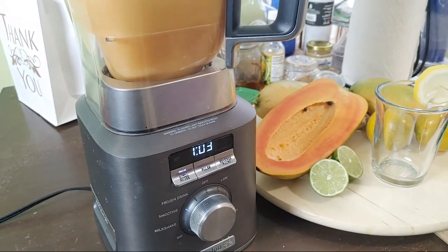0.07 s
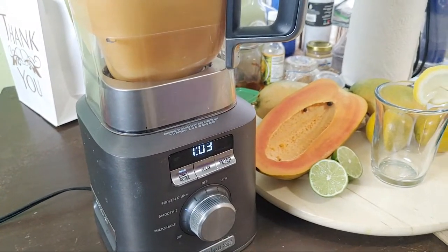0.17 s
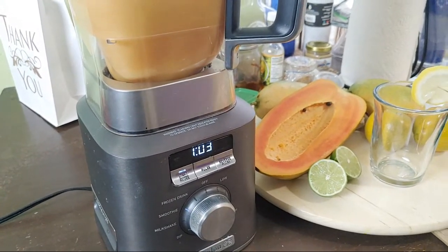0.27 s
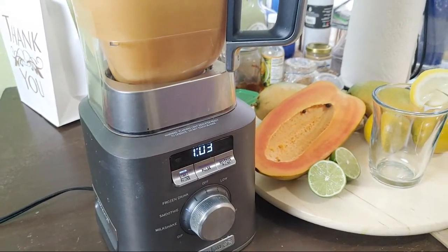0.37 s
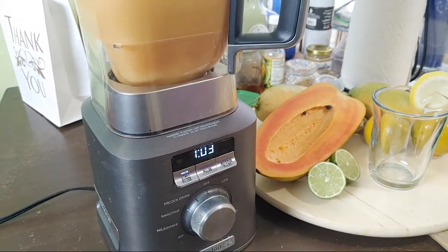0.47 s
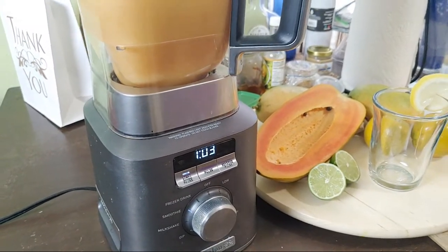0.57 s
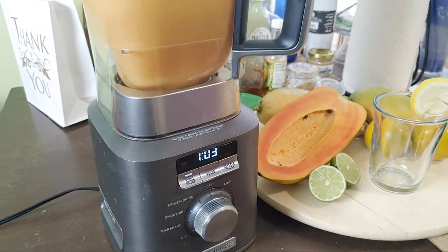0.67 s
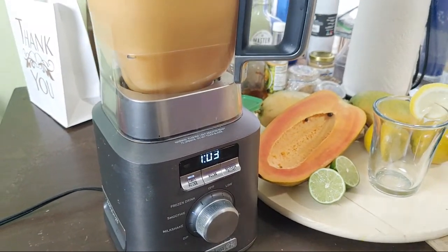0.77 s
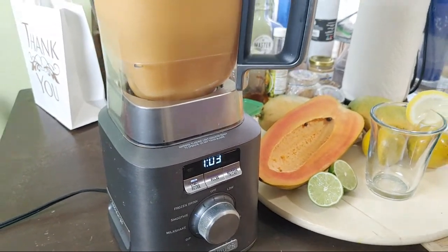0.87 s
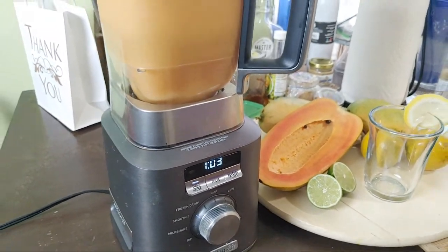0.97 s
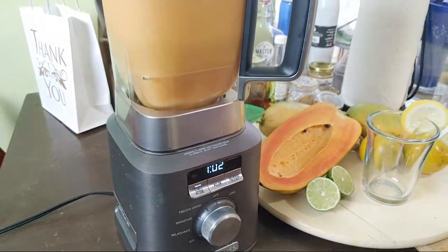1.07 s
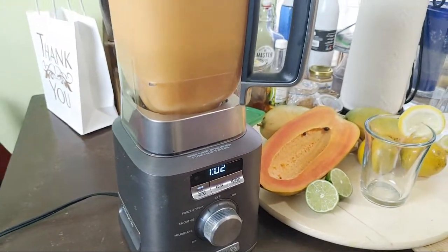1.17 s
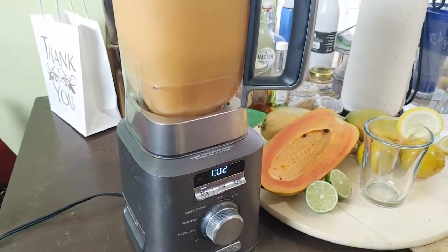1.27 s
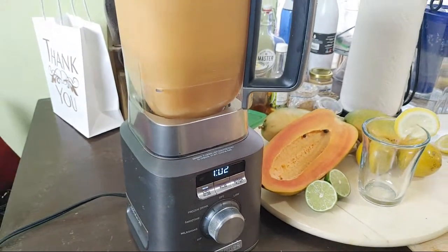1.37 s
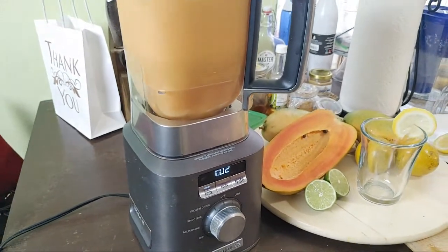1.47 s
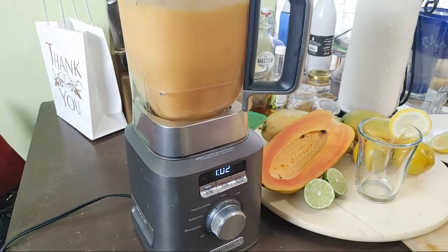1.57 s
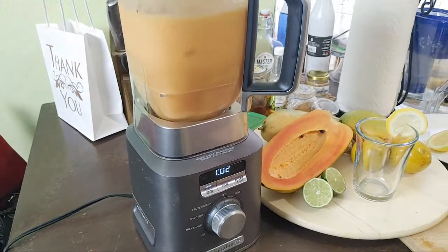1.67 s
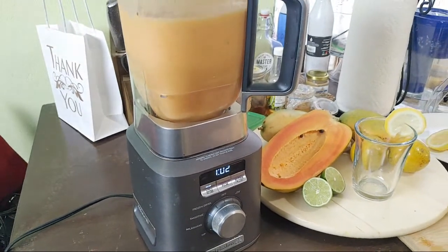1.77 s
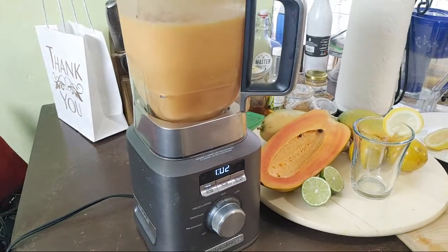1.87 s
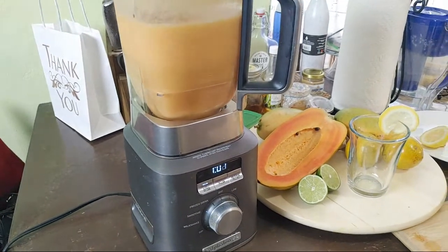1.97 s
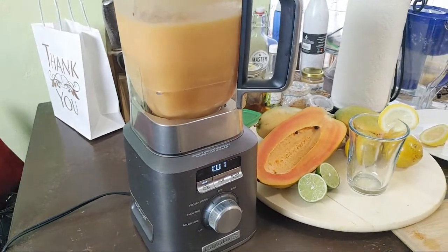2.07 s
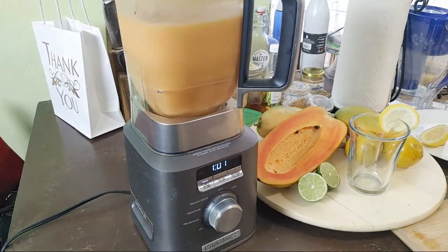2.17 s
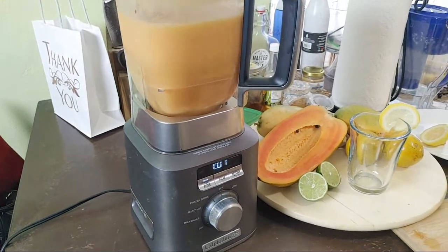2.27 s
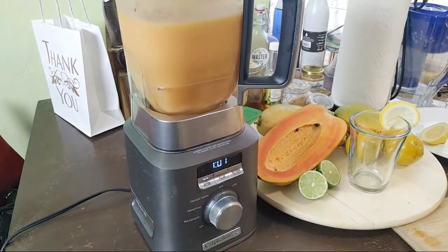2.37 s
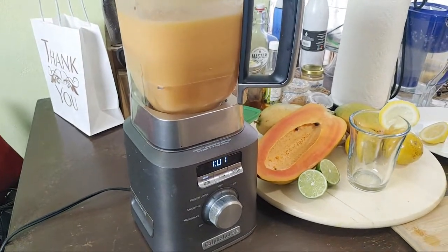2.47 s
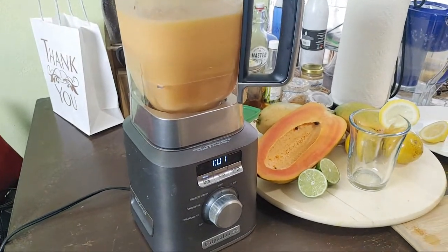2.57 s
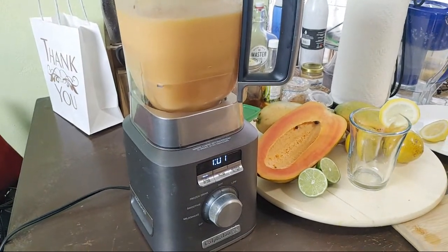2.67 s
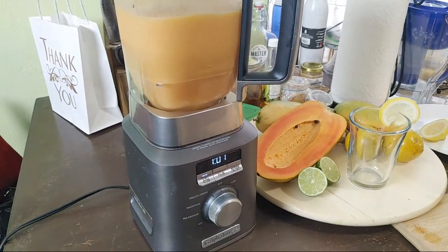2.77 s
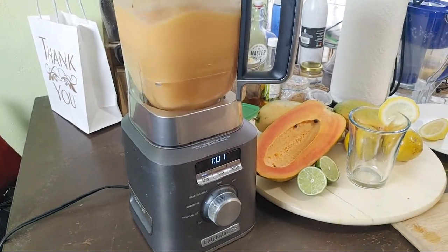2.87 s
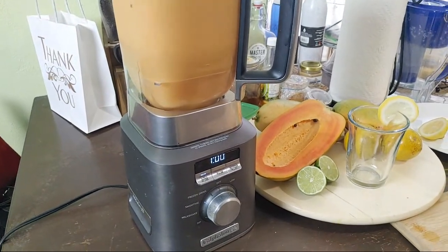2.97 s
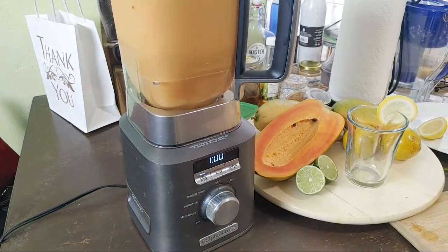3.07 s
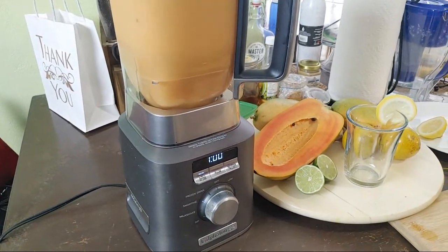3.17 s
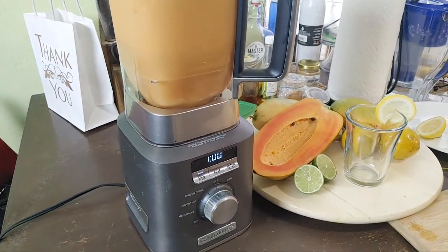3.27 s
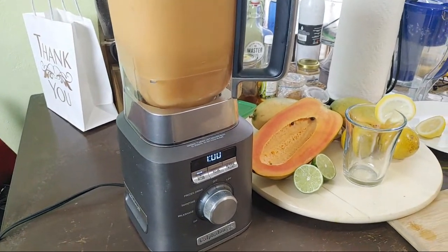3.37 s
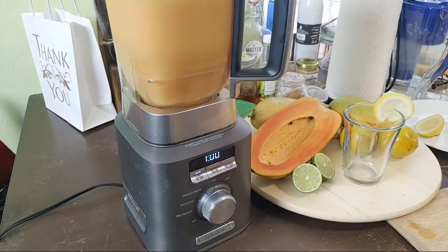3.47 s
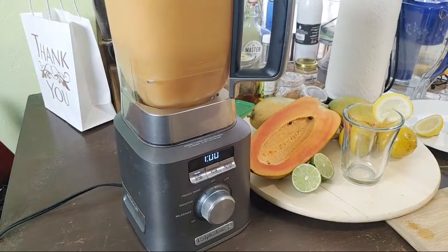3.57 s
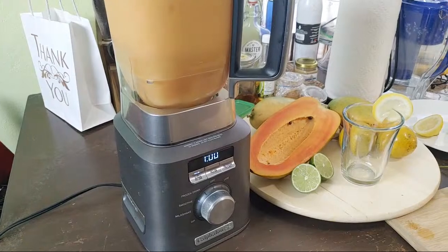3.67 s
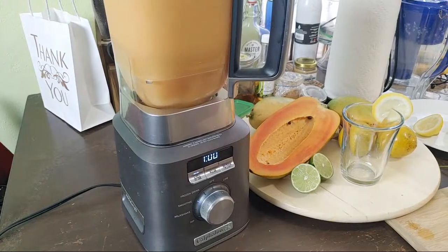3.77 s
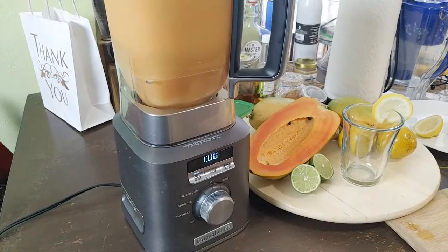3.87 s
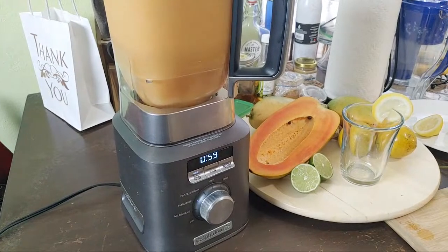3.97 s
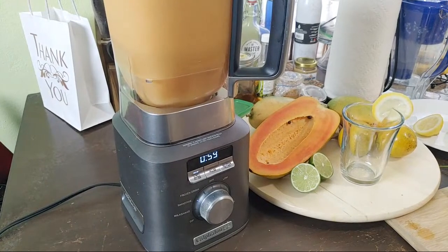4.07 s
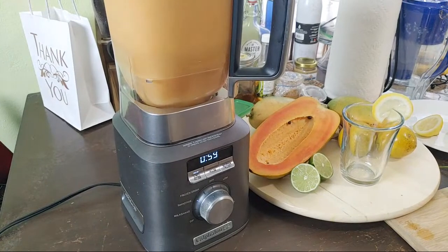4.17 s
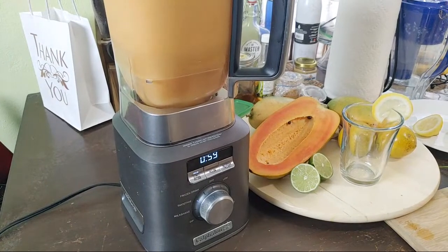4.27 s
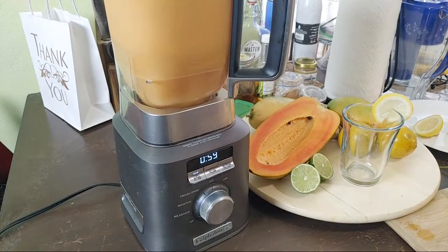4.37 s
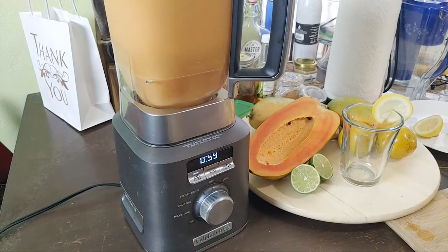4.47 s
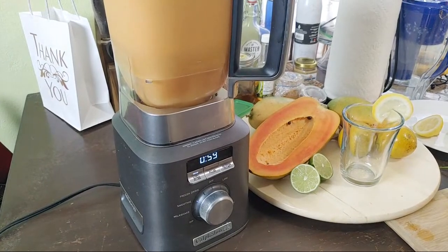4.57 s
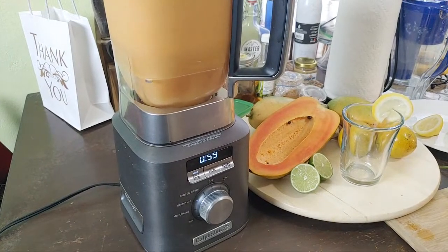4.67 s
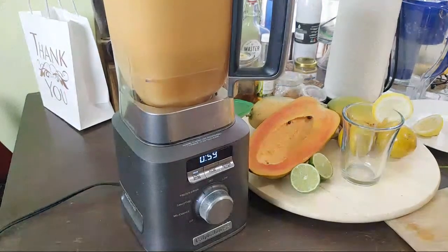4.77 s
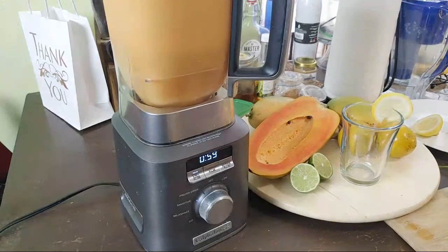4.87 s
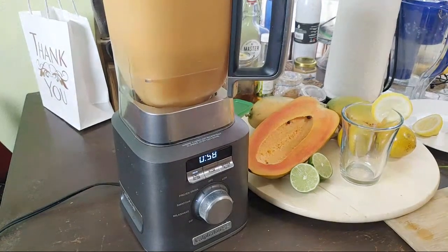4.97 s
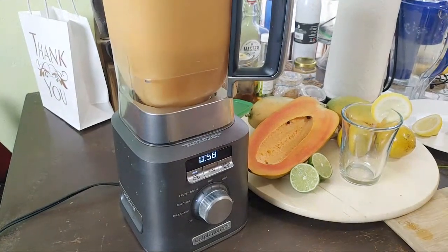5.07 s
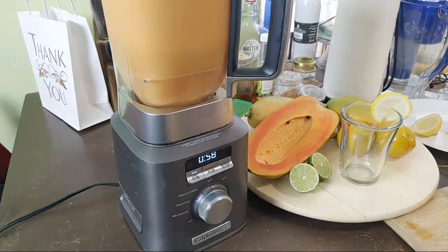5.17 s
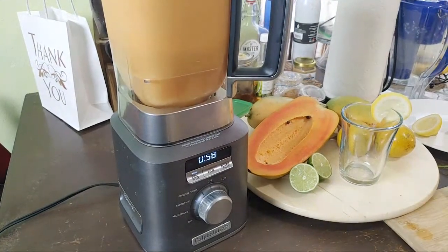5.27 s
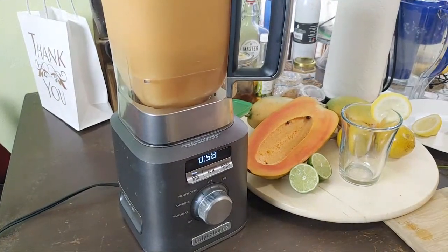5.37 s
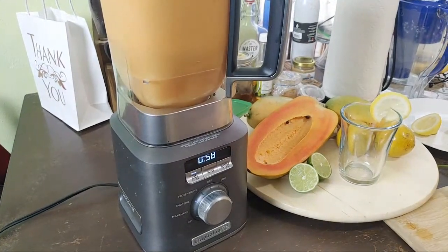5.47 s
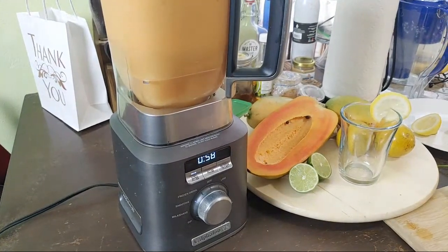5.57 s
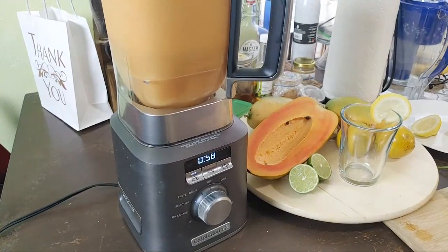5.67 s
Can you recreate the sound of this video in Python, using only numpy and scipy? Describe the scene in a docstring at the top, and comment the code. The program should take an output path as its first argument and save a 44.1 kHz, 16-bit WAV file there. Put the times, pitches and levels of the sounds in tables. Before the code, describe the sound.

A countertop blender is already running on thick icy pulp, heard close and dry in a small kitchen, the same in both channels. A hard, buzzy hum and gritty watery rush hold for about 1.1 s, with a few ice ticks early on and a brief sag near 0.55 s. The pitch slides down and the motor drops out by 1.4 s; slush settles with soft plops until only low room rumble and faint knocks remain around 1.9 s. A mains-like buzz grows from 2.1 s, ice clacks, with a sharp crack near 2.55 s, and the blades catch at about 2.7 s with a heavy wet heave. Pitch climbs steeply, reaching full speed around 3.7 s: a loud, rough whine with hissing spray and air, dipping briefly several times. At 5.4 s power cuts; the pitch falls quickly amid churning and several ice knocks until the end at about 5.7 s.

```python
"""A hard hum and a watery rush come first: a countertop blender working thick icy pulp. It stops,
starts again, runs up to full speed and is cut off, heard in a kitchen by one close microphone.
The shaft hums at multiples of its speed and the windings buzz at twice the mains, all as sine tones.
Pulp, ice grains and cooling air are gritty noise in shaped bands; ice chunks knock on the plastic jar
as decaying noise and damped rings. Low room rumble lies beneath, and both channels are the same."""
import sys
import numpy as np
from scipy import signal
from scipy.fft import rfft, irfft, next_fast_len
from scipy.io import wavfile

SR = 44100
rng = np.random.default_rng(int(sys.argv[2]) if len(sys.argv) > 2 else 0)


def unload_audio(sound):
    """Save the sound as a 16-bit wav file, at the path given as the first command line argument."""
    columns = np.transpose(np.atleast_2d(sound))
    # keep every value between -1 and 1, then stretch to whole-number steps
    steps = np.round(np.clip(columns, -1, 1) * 32767)
    wavfile.write(sys.argv[1], SR, steps.astype(np.int16))


N = 252693
FULL_SPEED = 232   # turns per s, the reference for every level given "at full speed"

# The shaft, one table for each run. Each row: time in seconds, speed in turns per s.
SPEED = [
    [(0.0, 143), (0.09, 151.5), (0.2, 147.5), (0.3, 138.5), (0.75, 136), (1.12, 131), (1.25, 119),
     (1.33, 108), (1.37, 101)],
    [(2.67, 64), (2.78, 92), (3.0, 125), (3.1, 165), (3.18, 185), (3.42, 216), (3.56, 225), (3.72, 235.2),
     (4.26, 237.6), (4.5, 236), (4.85, 238.8), (5.38, 236), (5.43, 221), (5.5, 180), (5.65, 120),
     (5.73, 100)],
]
# The vortex collapses and drags on the blades. Each row: time in seconds, speed lost in turns per s.
DRAGS = [(0.55, 6.5), (3.89, 7.5), (4.09, 2.2), (4.37, 6), (4.68, 3), (4.99, 6), (5.31, 2.5)]
DRAG_S = 0.075   # from the deepest point of a drag to 1/e of it
# Tones of the shaft. Each row: multiple of the speed, level at full speed in dB before the housing,
# slope in dB per octave of speed, gain in dB per turn/s of drag, share of the current's fall in dB per dB,
# waver in dB and phase blur in radians, both before they are scaled by the shaking.
ORDERS_OF_SHAFT = [(1, -38, -3.5, 0.43, 0.16, 4.4, 1.35), (2, -37, 3.5, 0.82, 0.47, 2.5, 1.36),
                   (3, -44, 10, 1.4, 1.3, 3, 0.97), (4, -29.5, 29, 0.65, 0.94, 1, 0.079),
                   (5, -33.5, 8, 1.5, 1.9, 1, 0.38), (6, -37, 17, -0.5, 0.72, 1, 0.91),
                   (7, -42.5, 10, -0.4, 0.65, 4, 0.35), (8, -40, 5, -0.14, 0.51, 2, 1.2)]
# How well the housing passes a tone. Each row: frequency in Hz, gain in dB.
HOUSING = [(60, -9), (100, -2.5), (118, 0.5), (135, 10.5), (160, 8), (185, 10.5), (200, -11), (214, 9),
           (228, 0.7), (270, 2), (300, 10.5), (350, -4.5), (415, 12.5), (470, -5.7), (620, -8), (740, -10),
           (850, 1.5), (940, 6.5), (990, 7), (1070, -4.5), (1180, 0.9), (1900, 1.5)]


def motor():
    """Shaft tones through the housing, changed by drag and current; also gives angle and speed."""
    t = np.arange(N) / SR
    hum, angle = np.zeros(N), np.zeros(N)
    turning = np.ones(N)      # one turn per s at rest keeps later logarithms finite
    drag = sum(lost * np.exp(-((t - s) / DRAG_S) ** 2) for s, lost in DRAGS)
    current_db = in_time(BUZZ)[0] - np.max(np.transpose(BUZZ)[1])
    housing_hz, housing_db = np.transpose(HOUSING)
    for turns in SPEED:
        speed = in_time(turns)[0] - drag
        start, end = turns[0][0], turns[-1][0]
        # fades of 30 ms just outside the run
        on = np.clip(np.minimum(t - start + .03, end + .03 - t) / .03, 0, 1)
        turn = 2 * np.pi * np.cumsum(speed * (1 + .003 * drift(25))) / SR
        shake = (speed / FULL_SPEED) ** 10      # near full speed the base rocks and blurs the tones
        for multiple, db, slope_db, drag_db, share, waver_db, blur in ORDERS_OF_SHAFT:
            level = db + slope_db * np.log2(speed / FULL_SPEED)
            level += drag_db * drag + share * current_db
            level += np.interp(np.log(multiple * speed), np.log(housing_hz), housing_db)
            level += waver_db * (.35 + shake) * np.clip(drift(9), -2.5, 1.2)
            phase = multiple * turn + blur * shake * drift(15.2) + rng.uniform(0, 2 * np.pi)
            hum += on * np.sqrt(2) * amp(level) * np.sin(phase)
        angle = np.where(on > 0, turn, angle)
        turning = turning + on * speed
    return hum, angle, turning


# Current through the windings, as the level of their buzz. Each row: time in seconds, level in dB.
BUZZ = [(0, -38.5), (1.15, -40), (1.25, -59), (2.0, -55), (2.12, -48), (2.26, -37.5), (2.4, -38),
        (5.4, -38), (5.48, -81)]
MAINS_BUZZ_HZ, BUZZ_SECOND_DB = 120, -20.5   # the second harmonic is against the first


def windings():
    """Magnetic pull at twice the mains rate while current flows."""
    turn = 2 * np.pi * MAINS_BUZZ_HZ * np.arange(N) / SR
    wave = np.sin(turn) + amp(BUZZ_SECOND_DB) * np.sin(2 * turn)
    return np.sqrt(2) * amp(in_time(BUZZ)[0] + drift(4.3)) * wave


# The mixture. Each row: time in seconds, heave of the pulp in dB, rush on the jar wall in dB,
# spray and cooling air in dB; the slugs shift all three.
MIXTURE = [(0.0, -29, -27, -38.5), (0.12, -33, -24.5, -41), (1.13, -33.5, -27, -41.5),
           (1.33, -36.5, -29, -46), (1.5, -36.5, -39.5, -58.5), (1.61, -41.5, -39.5, -63),
           (1.69, -49, -50.5, -66), (1.81, -45, -42, -62.5), (1.9, -63.5, -63, -78),
           (2.12, -49.5, -62, -76.5), (2.37, -42.5, -44.5, -59.5), (2.61, -36, -36, -55),
           (2.72, -34, -27, -46.5), (2.82, -17, -22.5, -41), (3.02, -22, -24, -44), (3.07, -36, -28, -40),
           (3.4, -32.5, -25, -35), (5.36, -37, -26, -34.5), (5.42, -31, -28.5, -37.5),
           (5.58, -29, -28.5, -43.5), (5.73, -32.5, -36.5, -50.5)]
# Colour of the heaving pulp. Each row: frequency in Hz, relative level in dB per Hz.
HEAVE = [(18, -69), (30, -71), (102, -5.5), (161, -6.5), (305, 5), (400, -7.5), (604, -7), (900, -9),
         (1170, -19), (1980, -120)]
# Colour of the rush on the wall. Each row: frequency in Hz, relative level in dB per Hz.
RUSH = [(240, -26), (400, -8.5), (708, 4.5), (903, -4), (1200, 3.5), (1510, -5), (1990, -5.5), (2860, -12),
        (5000, -41.5), (6500, -107), (11000, -120)]
# Colour of spray and cooling air. Each row: frequency in Hz, relative level in dB per Hz.
AIR = [(2500, 1.5), (3500, -2.5), (5000, 0), (7000, 2), (9000, 4.5), (12000, -6.5), (15500, -7)]
# ring of the wall against the plain rush: level at rest, and its growth per turn/s
JAR_RING_DB, JAR_RING_DB_PER_TURN = -2, 0.02


def mixture(angle, speed):
    """Pulp heaves, grains rush on the wall with a swell once a turn, spray and air hiss."""
    heave_db, rush_db, air_db = in_time(MIXTURE) + slugs()
    sweep = 1 + 0.14 * np.cos(angle)      # the load passes one side of the jar each turn
    grains = gritty(900, 3.6, -6) * sweep
    heave = coloured(gritty(150, 1.67, -15), HEAVE, patchy_db=1.9)
    wall_ring = amp(JAR_RING_DB + JAR_RING_DB_PER_TURN * speed) * rms_one(jar(grains))
    rush = rms_one(coloured(grains, RUSH, patchy_db=2.0) + wall_ring)
    spray = grains + amp(2.5) * gritty(4000, 7.0, -7)
    air = coloured(spray, AIR, patchy_db=1.23)
    return amp(heave_db) * heave + amp(rush_db) * rush + amp(air_db) * air


# A slug of pulp drops onto the blades. Each row: start in seconds, then the change of the heave,
# of the rush and of the spray, all in dB.
SLUGS = [(1.735, 3.5, -10, -4), (2.545, -1, 0, 10), (2.63, 13, 9.5, 8), (2.752, -2, -1.5, -1),
         (3.14, -1, 6.5, 4.5)]
SLUG_RISE_S, SLUG_HOLD_S, SLUG_FALL_S = 0.0037, 0.019, 0.061


def slugs():
    """Change in dB of the three mixture layers: each slug sets in, holds and dies away."""
    t = np.arange(N) / SR
    edges = np.cumsum([0, SLUG_RISE_S, SLUG_HOLD_S, SLUG_FALL_S])
    return sum(np.outer(change, np.interp(t - s, edges, [0, 1, 1, 0])) for s, *change in SLUGS)


# Modes of the plastic jar wall. Each row: frequency in Hz, width in Hz, relative level in dB.
JAR = [(320, 30, -7), (440, 22, 1.5), (929, 53, 9.5), (1162, 52, 11), (1355, 100, 2), (1910, 270, -4.5),
       (2644, 430, -12)]


def jar(x):
    """The wall rings in a few damped modes of alternating sign."""
    return sum((-1) ** k * amp(db) * resonance(x, hz, width) for k, (hz, width, db) in enumerate(JAR))


# Ice chunks on the jar, as the drive of each part before its own gain. Each row: time in seconds,
# crack in dB, then bright splinter, wall knock and low thud in dB against the crack.
KNOCKS = [(0.1334, -28.5, -11, 13, -18), (0.1623, -27, -10.5, 8, -13), (0.2687, -20, -16.5, 4, -14),
          (1.284, -24, -19, -9, -11), (1.351, -29, -30, -9, -16), (1.4638, -39, -23, 4, -12),
          (1.5452, -43, -10, 12.5, 0), (1.594, -36, -18, -1, -9), (1.6494, -46.5, -7.5, 10, 0),
          (1.6897, -36.5, -21, 8, 3), (1.7372, -42.5, -23, -11, 23), (1.7768, -30.5, -27, -23, 1),
          (1.7944, -36.5, -17, 4.5, 3), (1.8208, -30.5, -23, 3.5, -22), (1.8895, -49, -21, -1, -7),
          (1.9133, -57, -26, 5, 13), (1.999, -52, -25, 13.5, -13), (2.078, -57, -14, -7, 20),
          (2.189, -46.5, -17, -1, 7), (2.2449, -47, -30, -12, 17), (2.295, -39, -22, -1, 5),
          (2.3803, -37.5, -22, 8, 9), (2.4183, -30.5, -29, 4.5, 8), (2.4412, -31, -17.5, 2, -2),
          (2.5282, -35, -15, 11, -15), (2.5476, -14, -17.5, -9.5, -13), (2.6513, -24.5, -10.5, 3, -13),
          (2.6695, -23, -16, 13.5, 6), (2.754, -20.5, -25, 4.5, 8.5), (2.789, -24, -15, 4, 3),
          (2.8496, -26, -8, 6, -3), (2.9162, -30.5, -11, 13, -7), (3.0868, -17.5, -25, -23, -5),
          (3.169, -21, -16, -1, -2), (5.4753, -31, -16, 9, -4), (5.5586, -22.5, -12, 7.5, 6),
          (5.5727, -18, -14.5, 1, -7), (5.6726, -23.5, -22, 5, 0), (5.7083, -29, -10.5, 5, 2)]


def knocks():
    """A chunk cracks, splinters, sets the wall ringing and shoves the pulp."""
    s, crack_db, bright_db, wall_db, thud_db = np.transpose(KNOCKS)
    blows = np.zeros((4, N)) + 1e-18
    drive_db = crack_db + np.array([0 * s, bright_db, wall_db, thud_db])
    blows[:, np.round(s * SR).astype(int)] = amp(drive_db)
    fall = amp(-60 / (0.031 * SR))      # 60 dB down in 31 ms
    dying = signal.lfilter([1], [1, -fall], blows[:2]) * rng.standard_normal(N)
    dying += 2.4 * blows[:2]      # the first touch is a clean click
    crack_band = signal.butter(2, [1500, 4500], "band", fs=SR, output="sos")
    splinter_band = signal.butter(3, [4500, 10500], "band", fs=SR, output="sos")
    crack = amp(-3.5) * signal.sosfilt(crack_band, dying[0])
    splinter = amp(10.5) * signal.sosfilt(splinter_band, dying[1])
    wall = amp(30.5) * resonance(jar(blows[2]), 1200, 1100)
    shove = resonance(blows[3], 180, 180)
    # a short push, then a ring
    thud = amp(28.5) * resonance(shove, 180, 100) + amp(44.5) * resonance(shove, 236, 22)
    return crack + splinter + wall + thud


# Cooling air in the vents. Each row: frequency in Hz, width in Hz, level at full speed in dB.
VENTS = [(7020, 540, -44.5), (8184, 200, -42), (8473, 290, -39.5)]


def vents(speed):
    """Cooling air sizzles in narrow bands, steeply louder with speed."""
    return with_speed(VENTS, 36, speed)


# The base of the machine. Each row: frequency in Hz, width in Hz, level at full speed in dB.
BASE = [(214, 5.5, -44), (452, 22, -36.5), (1358, 135, -33)]


def base(speed):
    """The base rings under the shaking, steeply louder with speed."""
    return with_speed(BASE, 34, speed)


def with_speed(modes, db_per_octave, speed):
    """Rough noise twice through each narrow resonance, louder the faster the shaft turns."""
    rough = gritty(1700, 4.5, -3.5)
    rings = 0
    for hz, width, db in modes:
        narrow = resonance(resonance(rough, hz, width), hz, width)
        rings = rings + amp(db) * rms_one(narrow)
    return rings * amp(db_per_octave * np.log2(speed / FULL_SPEED))


ROOM_LOW_T60_S, ROOM_DB = 0.074 / 4.5, -13   # 60 dB decay time at the lowest pitch; send level


def kitchen(x):
    """Eight feedback delays whose treble dies sooner, dulled by the walls."""
    size = next_fast_len(N + SR)
    hz = np.arange(size // 2 + 1) * SR / size
    echoes = 0
    for lag in rng.uniform(.012, 0.022, 8):      # seconds
        loss_db = -60 * lag / ROOM_LOW_T60_S * (1 + hz / 27000)
        loop = amp(loss_db) * np.exp(-2j * np.pi * hz * lag)
        echoes = echoes + loop / (1 - loop)
    return irfft(rfft(x, size) * echoes, size)[:N]


# Colour of the quiet room. Each row: frequency in Hz, relative level in dB per Hz.
KITCHEN_FLOOR = [(15, -55), (25, -17), (108, 6), (146, 4.5), (724, -25), (1150, -29), (3000, -37),
                 (3900, -78), (9000, -66), (11000, -58), (13000, -54), (15500, -54)]
FLOOR_DB = -48


def kitchen_floor():
    """The room's steady rumble, as noise in shaped bands."""
    return amp(FLOOR_DB) * coloured(rng.standard_normal(N), KITCHEN_FLOOR, patchy_db=-0.5)


def amp(db):
    """dB to gain."""
    return 10 ** (np.asarray(db) / 20)


def rms_one(x):
    """Scale to rms 1."""
    return x / np.sqrt(np.mean(x ** 2) + 1e-20)


def in_time(rows):
    """Columns of a curve at every sample."""
    s, *columns = np.transpose(rows)
    return [np.interp(np.arange(N) / SR, s, c) for c in columns]


def drift(rate):
    """Slow chance of rms 1: noise, drawn every 40 samples, through two poles at the rate in Hz."""
    r = np.exp(-2 * np.pi * rate * 40 / SR)
    slow = signal.lfilter([1], [1, -2 * r, r * r], rng.standard_normal(N // 40 + 2002))
    slow = slow[2000:]      # drop the filter's settling
    return np.interp(np.arange(N) / 40, np.arange(len(slow)), rms_one(slow))


def resonance(x, hz, width_hz):
    """Band-pass of gain 1 at its top."""
    r = np.exp(-np.pi * width_hz / SR)
    top = np.array([1, 0, -1]) * (1 - r * r) / 2
    return signal.lfilter(top, [1, -2 * r * np.cos(2 * np.pi * hz / SR), r * r], x)


def gritty(per_s, spread_db, grit_db):
    """Smooth noise with random grains of uneven size on top."""
    sizes = amp(spread_db * np.minimum(rng.exponential(1, N), 5)) * rng.choice([-1, 1], N)
    grains = sizes * (rng.random(N) < per_s / SR)
    return rng.standard_normal(N) + amp(grit_db) * rms_one(grains)


def coloured(x, spectrum, patchy_db):
    """Third-octave bands, each at its level, flickering partly together; scaled to rms 1."""
    hz, db = np.transpose(spectrum)
    thirds = np.arange(np.floor(3 * np.log2(hz[0])), 3 * np.log2(hz[-1]) + 1)
    edges = 2 ** (thirds / 3)
    out, together = 0, drift(22)
    for k, (low, high) in enumerate(zip(edges, edges[1:])):
        band = signal.sosfilt(signal.butter(2, [low, high], "band", fs=SR, output="sos"), x)
        level = np.interp(np.log(low * high) / 2, np.log(hz), db)
        flicker = patchy_db * (together + 0.5 * drift(3.2))
        out = out + (-1) ** k * band * amp(level + flicker)
    return rms_one(out)


def scene():
    """The blender over the room's rumble, the same in both channels; only the knocks echo."""
    hum, angle, speed = motor()
    hits = knocks()
    blender = hum + windings() + mixture(angle, speed) + hits + vents(speed) + base(speed)
    heard = blender + amp(ROOM_DB) * kitchen(hits) + kitchen_floor()
    return np.array([heard, heard])


# Dips in the microphone's treble. Each row: frequency in Hz, width in Hz, gain in dB.
MICROPHONE = [(7750, 280, -21), (8550, 1030, -1), (10930, 4500, -15.5)]
CUTOFF_HZ = 15730   # from here up everything is at least 60 dB down


def record(dry):
    """The microphone dips the treble; the top is cut."""
    for hz, width, db in MICROPHONE:
        dry = dry + (amp(db) - 1) * resonance(dry, hz, width)
    return signal.sosfilt(signal.cheby2(22, 60, CUTOFF_HZ, fs=SR, output="sos"), dry)


dry = scene()
out = record(dry)
unload_audio(out)
```